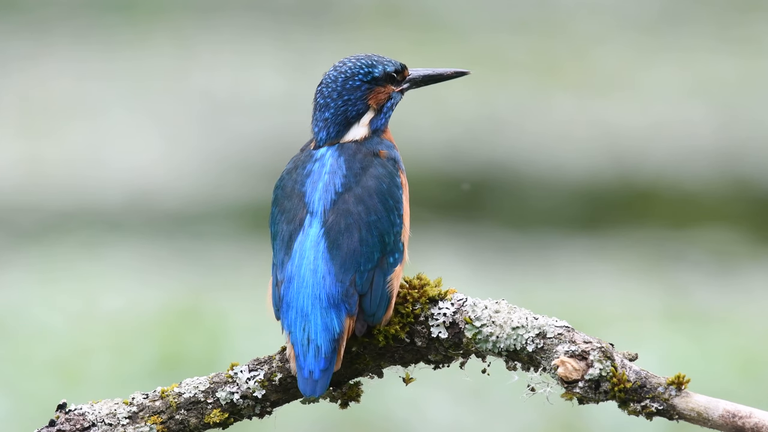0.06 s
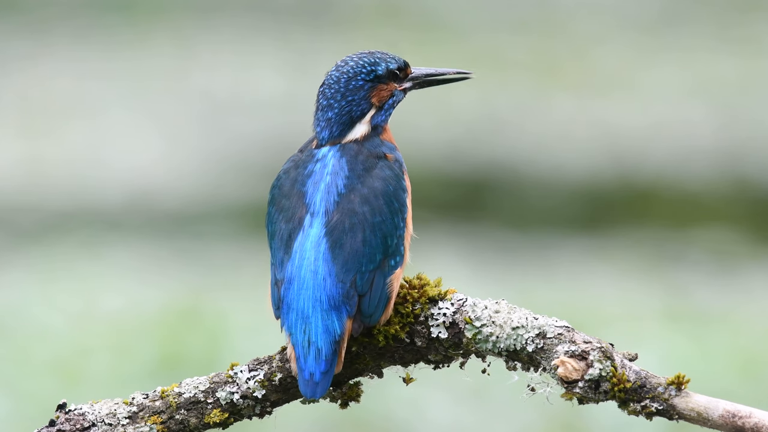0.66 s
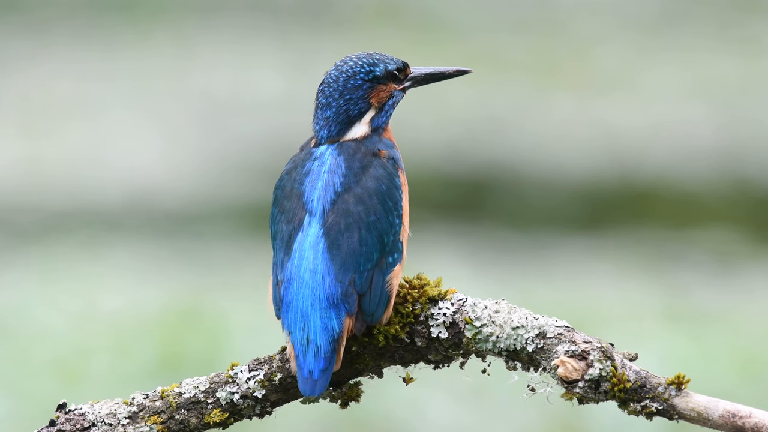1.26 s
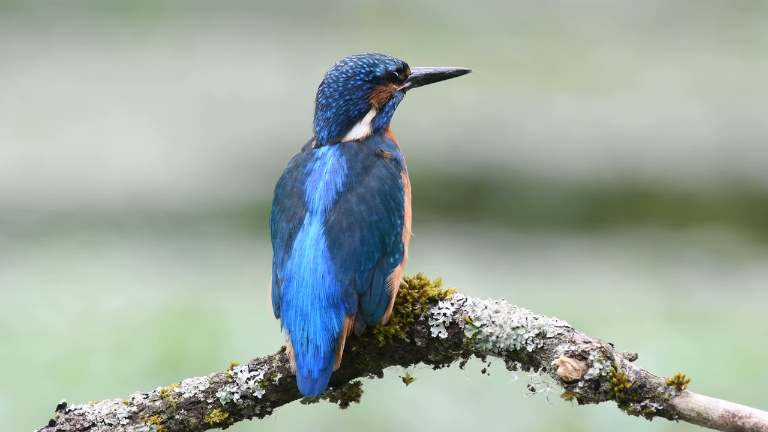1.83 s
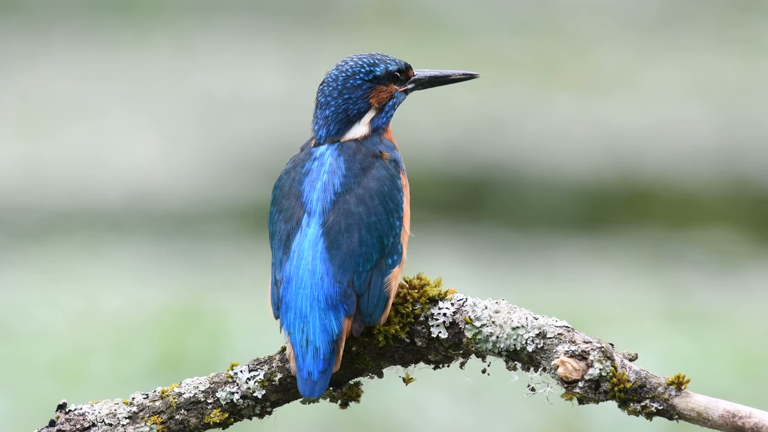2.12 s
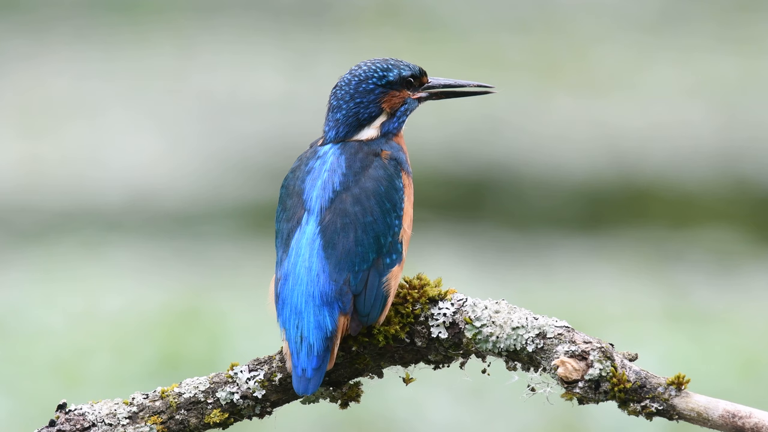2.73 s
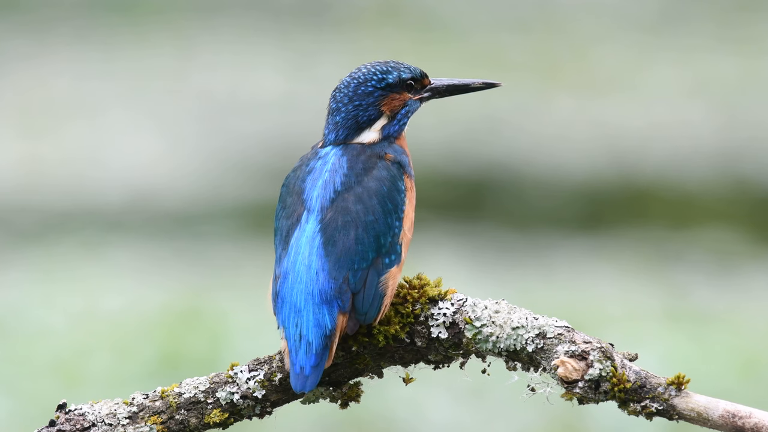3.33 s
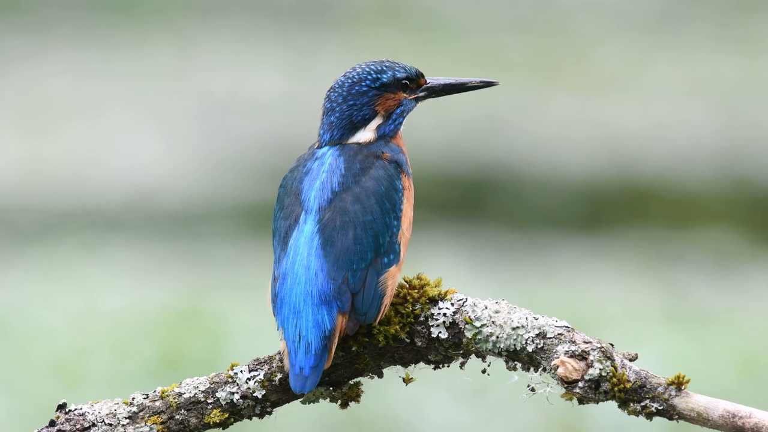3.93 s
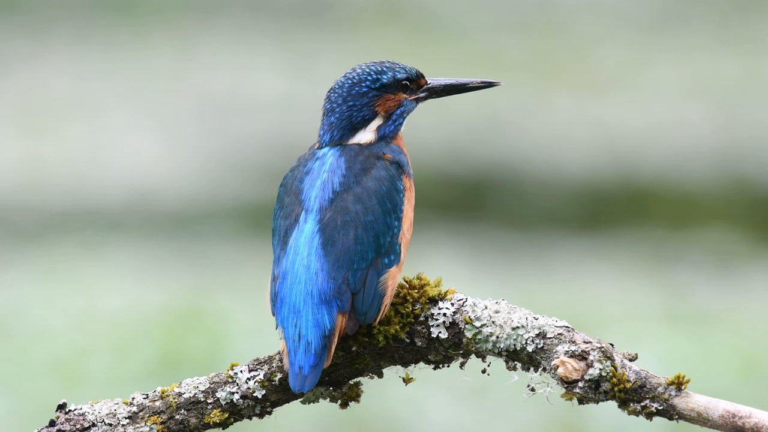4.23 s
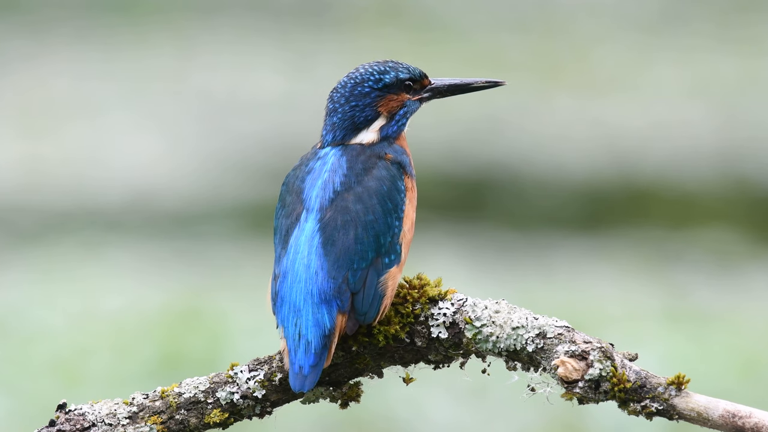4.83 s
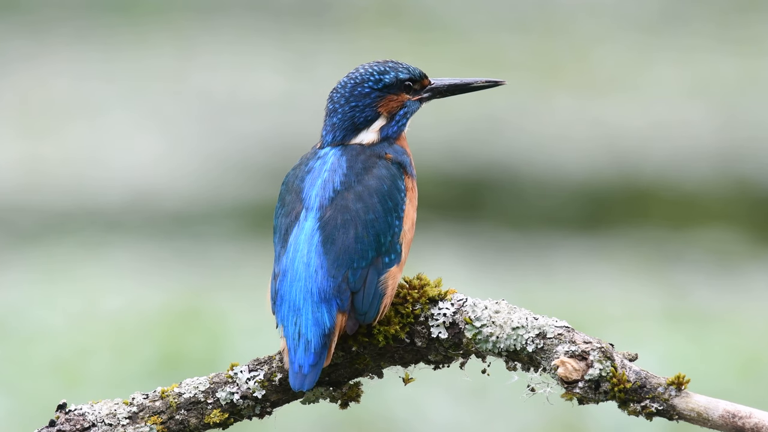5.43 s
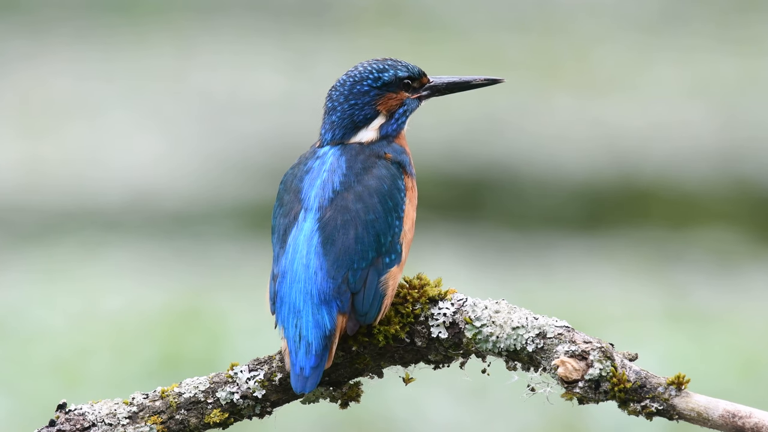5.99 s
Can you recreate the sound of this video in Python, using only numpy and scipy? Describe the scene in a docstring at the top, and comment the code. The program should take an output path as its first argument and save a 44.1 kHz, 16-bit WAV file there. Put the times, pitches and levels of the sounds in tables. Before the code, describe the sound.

A nearby kingfisher whistles beside a wooded pond, heard in stereo. Each call is high, piercing and almost pure, falling in pitch and leaving a short echo among the trees. A soft whistle comes at 0.4 seconds, a loud, longer one at 0.9, a softer one at 1.7, another loud one at 2.5 and a clipped one at 3.3. During the first second, a small bird quietly pipes four quick, even notes on one pitch. After a lull, a coot gives two short yelps with raspy ends at about 4.6 and 4.7 seconds, followed by a much fainter third. The kingfisher adds one last brief whistle at 5.9 seconds. Throughout, very faint distant songbirds chirp and warble, with a few soft, low hoots far away. Underneath lies a faint steady outdoor hiss and a low rumble that eases after two seconds.

```python
"""Kingfisher by a pond

A kingfisher gives six piercing, falling whistles and the wooded banks throw them back. A small bird
pipes four notes, songbirds warble and something hoots far off, and a coot yelps. Each voice is a
trembling tone scattered by the trees, over faint outdoor rumble and hiss, on a spaced microphone pair."""
import sys
import numpy as np
from scipy import signal
from scipy.fft import rfft, irfft
from scipy.io import wavfile
from scipy.ndimage import uniform_filter1d

SR = 44100
rng = np.random.default_rng(int(sys.argv[2]) if len(sys.argv) > 2 else 0)


def to_wav(s):
    """Save 16-bit WAV."""
    ch = np.atleast_2d(s).T  # columns
    pcm = np.round(np.clip(ch, -1, 1) * 32767)  # PCM
    wavfile.write(sys.argv[1], SR, pcm.astype(np.int16))


N = 267246
TIME, FREQS = np.arange(N) / SR, np.fft.rfftfreq(N, 1 / SR)


def gain_of(db):
    """Decibels to gain."""
    return 10 ** (np.asarray(db) / 20)


def unit_rms(x):
    """Scales to rms 1."""
    return x / np.sqrt(np.mean(x ** 2) + 1e-20)


def curve(points):
    """Spreads (f, value) points over the spectrum on a log-frequency axis."""
    f, value = np.transpose(points)
    return np.interp(np.log(FREQS + 1), np.log(f + 1), value)


def fader(points):
    """Gain ride through (t, level) points."""
    return gain_of(np.interp(TIME, *np.transpose(points)))


def add(mix, start, sound):
    """Drops a sound into the mix at start seconds."""
    part = mix[..., max(round(start * SR), 0):][..., :sound.shape[-1]]
    part += sound[..., :part.shape[-1]]


def pan(left_db):
    """Stereo gains with the left louder by left_db."""
    return gain_of(np.array([[left_db], [-left_db]]) / 2)


def drift(n, rate_hz):
    """Smooth random wander of rms 1."""
    lowpass = np.exp(-(np.fft.rfftfreq(SR, 1 / SR) / rate_hz) ** 2)
    loop = unit_rms(irfft(rfft(rng.standard_normal(SR)) * lowpass, SR))
    return loop[np.arange(n) % SR]


def noise(eq):
    """Noise coloured by an EQ curve, rms 1."""
    return unit_rms(irfft(rfft(rng.standard_normal(N)) * gain_of(curve(eq)), N))


def syrinx(rows, waver, flutter_db):
    """Phase and envelope of a bird's note from (t, f, level) rows; pitch and strength tremble."""
    times, pitch, level = np.transpose(rows)
    t = np.arange(times[0], times[-1], 1 / SR)
    hz = uniform_filter1d(np.interp(t, times, pitch), size=130) * (1 + waver * drift(len(t), 310))
    attack, release = (t - t[0]) / .0012, (t[-1] - t) / .007
    gate = np.sin(np.pi / 2 * np.clip(np.minimum(attack, release), 0, 1)) ** 2
    db = np.interp(t, times, level) + flutter_db * drift(len(t), 120)
    return 2 * np.pi * np.cumsum(hz) / SR, gate * gain_of(db)


def soft_note(rows, waver):
    """A pure note that fades in and out."""
    phase, envelope = syrinx(rows, waver, flutter_db=3)
    return envelope * signal.windows.tukey(len(envelope), .4) * np.sin(phase)


def trees(x, t60, build):
    """Reverb from leaves and trunks: sparse taps that build and die away, different on each side."""
    t = np.arange(round(1.5 * SR)) / SR
    taps = rng.choice([-1., 1.], (2, len(t))) * (rng.random((2, len(t))) < 3000 / SR)
    taps *= gain_of(-60 * t / t60) * (1 - np.exp(-t / build)) ** 2
    taps /= np.linalg.norm(taps, axis=1, keepdims=True)
    return signal.fftconvolve(np.atleast_2d(x), taps, axes=1)[:, :N]


# EQ of the hiss: f/Hz, relative level/dB
HISS_EQ = [(15, -30.5), (30, -11), (96, 2), (129, -5.5), (169, 1.5), (215, -8), (450, -9), (700, -11.5),
           (1300, -15), (2100, -16.5), (3300, -17), (4600, -15.5), (7000, -23), (9000, -24), (15500, -26)]
# EQ of the rumble: f/Hz, relative level/dB
RUMBLE_EQ = [(25, -12), (55, 1.5), (85, -0.5), (125, -14), (168, -2), (220, -17.5), (420, -23.5),
             (660, -13), (1000, -22), (2500, -49)]
# Fader ride on the rumble: t/s, level/dB
RUMBLE_RIDE = [(0, -61), (2.1, -62), (2.8, -68), (6, -68.5)]
# How mono the bed is: f/Hz, left-right correlation
BED_CORRELATION = [(30, 0.88), (80, .93), (170, 0.53), (350, 0.43), (900, 0.3), (3000, 0), (15000, 0.082)]


def outdoor_air():
    """The bed: steady hiss and a far rumble that ebbs; the bass is alike in both microphones."""
    hiss_gain, ebb = gain_of(-60.5), fader(RUMBLE_RIDE)
    left, other = (rfft(hiss_gain * noise(HISS_EQ) + ebb * noise(RUMBLE_EQ)) for _ in range(2))
    shared = curve(BED_CORRELATION)
    right = shared * left + np.sqrt(1 - shared ** 2) * other
    return pan(2.3) * irfft(np.array([left, right]), N)


# Fader ride on the chorus: t/s, level/dB
CHORUS_RIDE = [(0, -78.5), (1.1, -69.5), (2.8, -66), (3.8, -70.5), (5, -79), (6, -75)]


def far_chorus():
    """Many far birds: tiny gliding chirps that the trees blur into a wash."""
    chirps = np.zeros(N)
    for when, pitch, glide, span in rng.random(size=(300, 4)):
        t = np.arange(round((.02 + .04 * span) * SR)) / SR
        hz = (3200 + 1300 * pitch ** 2) * (1 + 5 * (glide - .5) * t)
        add(chirps, when * N / SR, np.hanning(len(t)) * np.sin(2 * np.pi * np.cumsum(hz) / SR))
    return fader(CHORUS_RIDE) * unit_rms(trees(chirps, t60=0.23, build=0.018))


# Whistle tail that opens the scene: f/Hz, level/dB, decay/(dB/s), length/s
OPENING_RING = (5258.5, -56, 94.5, 2)


def opening_ring():
    """The last ring of an earlier whistle, dying away on one pitch."""
    out = np.zeros(N)
    hz, db, decay, length = OPENING_RING
    phase, envelope = syrinx([(0, hz, db), (length, hz, db - decay * length)], waver=0.012, flutter_db=4)
    add(out, 0, envelope * np.sin(phase))
    return out


# Cues for the piped notes: t/s, level/dB
PIPE_CUES = [(0.056, -45), (0.315, -46.5), (0.582, -45), (0.823, -46)]


def small_bird():
    """Four quick notes, each scooping up to a steady pitch, drawn out by the trees."""
    pipes = np.zeros(N)
    t = np.linspace(0, .09, 60)
    hz = 3907 - 353 * np.exp(-t / .0065)
    for start, db in PIPE_CUES:
        phase, envelope = syrinx(np.transpose([t, hz, np.full_like(t, db)]), waver=0.0024, flutter_db=3.5)
        add(pipes, start, envelope * np.sin(phase))
    return pan(3) * (gain_of(-2.5) * pipes + gain_of(-0.5) * trees(pipes, t60=0.62, build=0.0026))


# Cues for the slurs: t/s, length/s, first f/Hz, last f/Hz, level/dB
SLUR_CUES = [(0.306, 0.14, 1700, 1670, -68), (0.596, .26, 2195, 1655, -67), (1.519, 0.17, 1558, 1617, -64),
             (1.879, 0.23, 2120, 2123, -62), (2.26, 0.091, 1920, 1931, -56.5),
             (2.404, .067, 2790, 2704, -60), (3.996, 0.138, 1633, 1830, -63.5),
             (4.327, 0.17, 1657, 2114, -64), (5.49, 0.056, 2200, 1493, -62), (5.992, .08, 1980, 2260, -64)]


def songbird_slurs(arch_hz=38.7):
    """Far notes that slide between two pitches, bowing upward in the middle."""
    out = np.zeros(N)
    progress = np.linspace(0, 1, 60)
    for start, length, first, last, db in SLUR_CUES:
        hz = first + (last - first) * progress + arch_hz * np.sin(np.pi * progress)
        rows = np.transpose([progress * length, hz, np.full_like(hz, db)])
        add(out, start, soft_note(rows, waver=0.0093))
    return out


def whistle_contour(length, rise, fall, hold, top_hz, settled_hz, db, top_db, settled_db):
    """Rows (t, f, level) of one whistle: a scoop up, a loud fall, a softer sagging note, a last droop."""
    scoop_hz_per_s, sag_hz, droop_hz, droop_s = 48000, 130, 150, 0.014
    knee = 0.32  # share of the fall after which the voice eases to its settled level
    t = np.linspace(0, length, 400)
    scoop = np.clip(1 - t / rise, 0, 1) ** 2
    fallen = np.clip((t - rise) / fall, 0, 1)
    sag = np.clip((t - rise - fall) / max(length - rise - fall, fall), 0, 1) ** 2.5
    droop = np.clip(1 - (length - t) / droop_s, 0, 1)
    hz = settled_hz + (top_hz - settled_hz) * (1 - fallen ** hold) ** 2
    hz -= scoop_hz_per_s * rise * scoop + sag_hz * sag + droop_hz * droop
    level = db + np.interp(fallen, [0, knee, 1], [top_db, 0, settled_db])
    level -= 7.5 * scoop + 4.5 * sag + 2.5 * droop
    return np.transpose([t, hz, level])


# Cues for the whistles: t/s, length/s, rise/s, fall/s, hold (higher stays longer at the top),
# top f/Hz, settled f/Hz, knee level/dB, top offset/dB, settled offset/dB,
# overtone trim/dB, pan left/dB, early send/dB, tail send/dB
WHISTLE_CUES = [ (0.358, 0.21, .010, 0.09, 1.5, 6404, 5480, -38, 7, -3.5, -31, -1.5, -10.5, 5.5),
                (.860, 0.37, 0.0071, 0.17, 1.27, 6002, 5275, -15.5, 0, -12, -22.5, -0.5, -1.5, -2.5),
                (1.677, 0.27, 0.0086, 0.11, 1.32, 6390, 5353, -35, 4, -10.5, -33, -2, -6, 7),
                (2.489, 0.37, 0.0074, 0.14, 1.34, 5885, 5267, -16, -4, -11, -22.5, 1.5, 0, 0),
                (3.319, 0.062, 0.015, 0.045, 1.35, 6466, 4990, -27.5, -6.5, -14.5, -31, -3.5, -2, 8),
                (5.911, .058, .017, 0.05, 2.7, 6445, 5260, -30, 4, -4.5, -15.5, -1.5, 2, 7)]


def kingfisher(right_lag_s=0.038e-3):
    """Near-pure whistles with a weak octave and a trace of third harmonic, thrown back by the woods."""
    direct, early_bus, tail_bus = np.zeros((3, 2, N))
    for start, *contour, overtone_db, pan_db, early_db, tail_db in WHISTLE_CUES:
        rows = whistle_contour(*contour)
        strength = gain_of(np.max(rows[:, 2]) + 14.5)  # soft whistles are less steady
        phase, envelope = syrinx(rows, waver=0.00099 / strength, flutter_db=0.5 / strength)
        hz = np.gradient(phase) * SR / (2 * np.pi)
        phase = np.array([phase, phase - 2 * np.pi * hz * right_lag_s])  # the right mic is farther away
        tone = envelope * pan(pan_db) * np.sin(phase)
        # the throat lets more of the overtones through as the pitch settles; they beam to the left
        throat = gain_of(overtone_db - 3.5 - 60 * np.log2(hz / 5270))
        overtones = envelope * throat * pan(18.2) * (np.sin(2 * phase) + gain_of(-20) * np.sin(3 * phase))
        add(direct, start, tone + overtones)
        add(early_bus, start, gain_of(early_db) * (tone + overtones))
        add(tail_bus, start, gain_of(tail_db) * tone)  # over long paths the air absorbs the overtones
    early = gain_of(-6.5) * trees(early_bus, t60=0.14, build=0.0051)
    tail = gain_of(-16) * trees(tail_bus, t60=1.026, build=0.005)
    return direct + bank_echoes(early_bus) + early + tail


# Slapback off the banks: left delay/ms, right delay/ms, level/dB
BANK_TAPS = [(13.3, 5.9, -11.5), (21.82, 55, -15.5), (34.3, 20.2, -10), (168, 180, -42.5)]


def bank_echoes(x):
    """A few distinct echoes; they beat against a gliding whistle."""
    out = np.zeros((2, N))
    for left_ms, right_ms, db in BANK_TAPS:
        add(out[0], left_ms / 1000, gain_of(db) * x[0])
        add(out[1], right_ms / 1000, gain_of(db) * x[1])
    return out


# Cues for the hoots: t/s, length/s, f/Hz, level/dB
HOOT_CUES = [(1.102, 0.51, 657, -68.5), (2.551, .75, 661, -68.5), (3.798, 0.11, 520, -68),
             (4.099, .45, 548, -64.5), (5.55, 0.24, 496, -68)]


def hoots():
    """Soft, low, unsteady notes from far away."""
    out = np.zeros(N)
    for start, length, hz, db in HOOT_CUES:
        add(out, start, soft_note([(0, hz, db), (length, hz, db)], waver=.06))
    return out


# Cues for the warbles: t/s, length/s, centre f/Hz, swing/Hz, rate/Hz, level/dB
WARBLE_CUES = [(1.632, .29, 1863, 163.3, 5.6, -63.5), (2.724, 0.25, 1845, 214, 10.5, -64),
               (5.793, 0.04, 3590, 150, 18, -59), (5.891, 0.054, 3840, 397, 21, -57.5)]


def songbird_warbles():
    """Far notes with a wide vibrato that starts from its trough."""
    out = np.zeros(N)
    for start, length, centre, swing, rate, db in WARBLE_CUES:
        t = np.linspace(0, length, 60)
        hz = centre - swing * np.cos(2 * np.pi * rate * t)
        add(out, start, soft_note(np.transpose([t, hz, np.full_like(t, db)]), waver=0.0093))
    return out


# Cues for the yelps: t/s, length/s, tone level/dB, rasp level/dB, ring f/Hz, ring level/dB
YELP_CUES = [(4.596, 0.031, -33.5, -43, 8990, -53.5), (4.725, 0.0298, -35, -43, 5806, -49.5),
             (4.83, 0.012, -56, -53, 5950, -76)]
# Harmonics of a yelp, fundamental first: relative level/dB
YELP_TIMBRE = [-1.5, -23, -24, -28.5, -28.5, -50]
# EQ of the closing rasp: f/Hz, relative level/dB
RASP_EQ = [(500, -19), (1100, -4), (1500, -3), (2000, 3), (2400, -34), (3200, -5.5), (4200, -44),
           (5800, -20), (7000, -19.5), (9100, -15), (10500, -42)]


def coot(hz=1155):
    """Each yelp is a short clear tone that breaks into a rasp; one high overtone rings on in the trees."""
    tone, bright, ring = np.zeros((3, N))
    rasp = noise(RASP_EQ)
    for start, length, db, rasp_db, ring_hz, ring_db in YELP_CUES:
        contour = [(0, .96 * hz, db - 11), (.22 * length, .99 * hz, db),
                   (.8 * length, 1.01 * hz, db), (length, .98 * hz, db - 5)]
        phase, envelope = syrinx(contour, waver=.008, flutter_db=.3)
        partials = [gain_of(level) * envelope * np.sin(k * phase) for k, level in enumerate(YELP_TIMBRE, 1)]
        hoarseness = 1 + 0.56 * drift(len(envelope), 296)
        add(tone, start, partials[0])
        add(bright, start, sum(partials[1:]) * hoarseness)
        closing_burst = np.exp(-((TIME - start - length + 0.001) / 0.005) ** 2)
        bright += gain_of(rasp_db) * rasp * closing_burst
        held = [(0, ring_hz, ring_db), (length, ring_hz, ring_db)]
        phase, envelope = syrinx(held, waver=0.021, flutter_db=2)
        add(ring, start, envelope * np.sin(phase))
    yelps = pan(2) * (tone + bright)
    reverb = gain_of(-6.5) * trees(tone + gain_of(6.5) * bright, t60=0.67, build=0.0068)
    out = yelps + reverb + trees(ring, t60=0.49, build=0.015)
    add(out, .037, gain_of(-13) * yelps)  # the opposite bank answers
    return out


def scene():
    """Near birds over the outdoor bed; the far voices share one reverb that blurs them."""
    far_bus = opening_ring() + songbird_slurs() + hoots() + songbird_warbles()
    far_voices = gain_of(-4.5) * far_bus + gain_of(-3) * trees(far_bus, t60=.7, build=.01)
    return outdoor_air() + far_chorus() + far_voices + small_bird() + kingfisher() + coot()


# Two narrow EQ notches cut into the whole sound, hollowing the hiss: f/Hz, width/Hz
NOTCH_EQ = [(2600, 230), (7700, 550)]


def record(dry, cutoff_hz=15650):
    """Master chain: two narrow notches, then a steep high cut."""
    notches = [1 - 0.93 * np.exp(-((FREQS - hz) / width) ** 2) for hz, width in NOTCH_EQ]
    notched = irfft(rfft(dry) * np.prod(notches, axis=0), N)
    high_cut = signal.firwin(511, cutoff_hz, window=("kaiser", 9), fs=SR)
    return signal.oaconvolve(notched, high_cut[None], "same")


dry = scene()
out = record(dry)
to_wav(out)
```